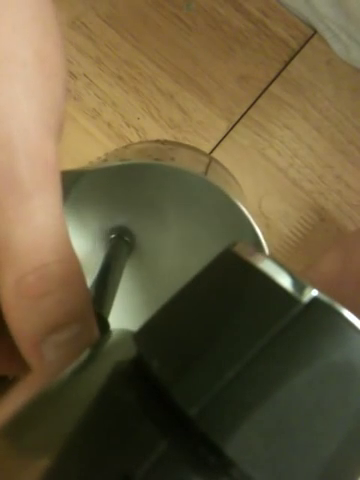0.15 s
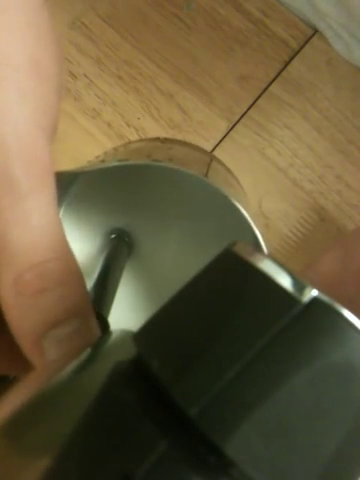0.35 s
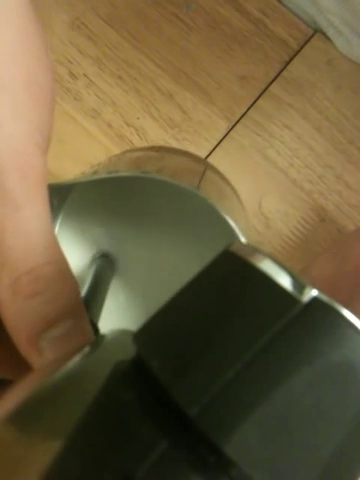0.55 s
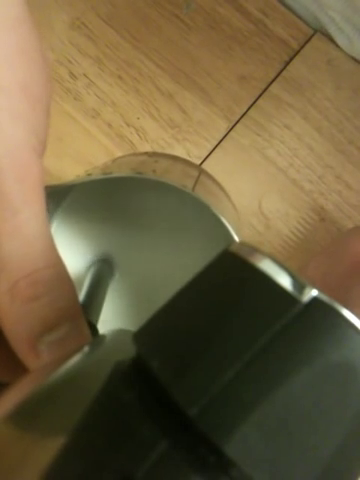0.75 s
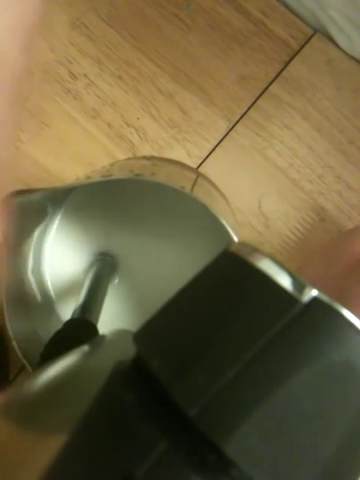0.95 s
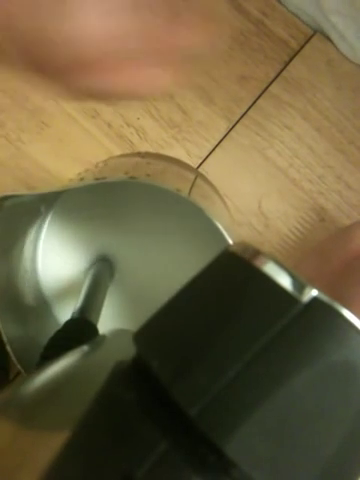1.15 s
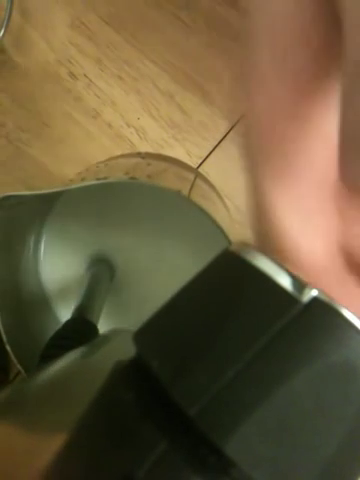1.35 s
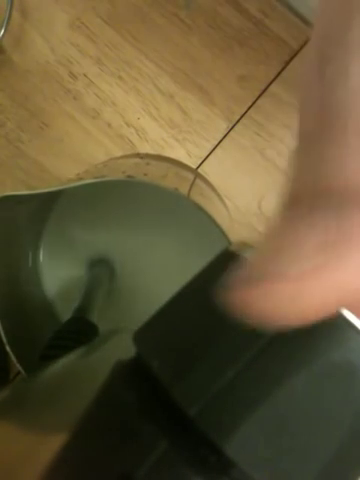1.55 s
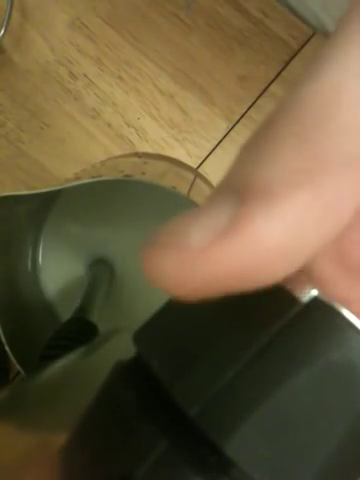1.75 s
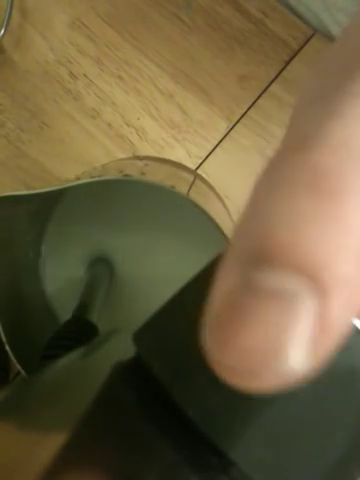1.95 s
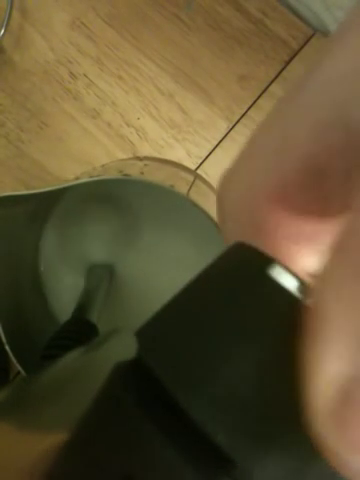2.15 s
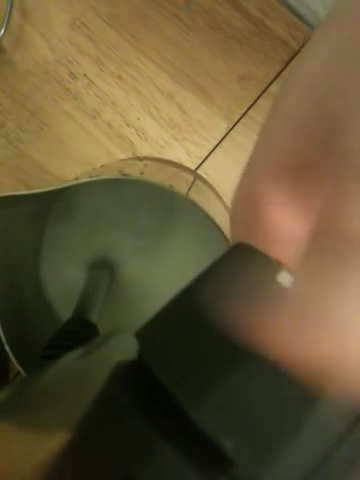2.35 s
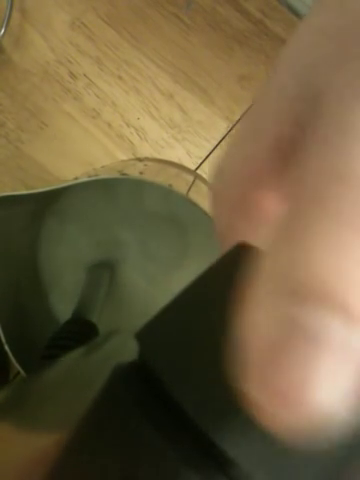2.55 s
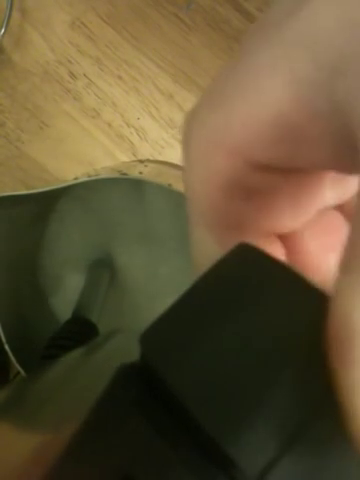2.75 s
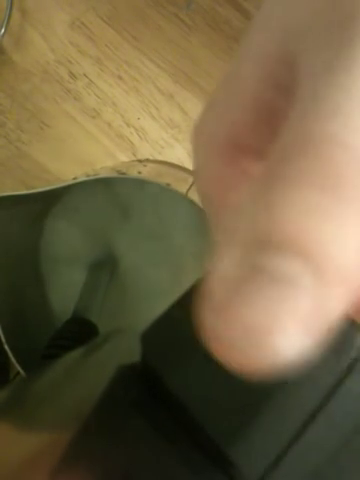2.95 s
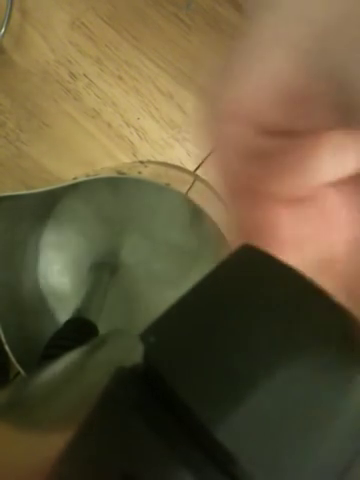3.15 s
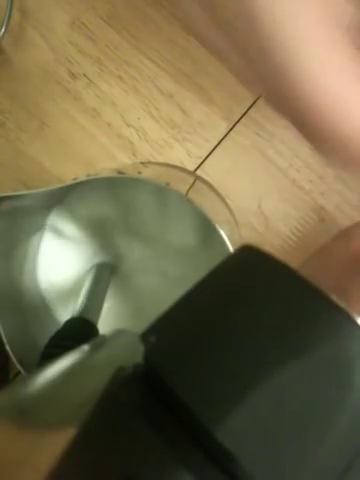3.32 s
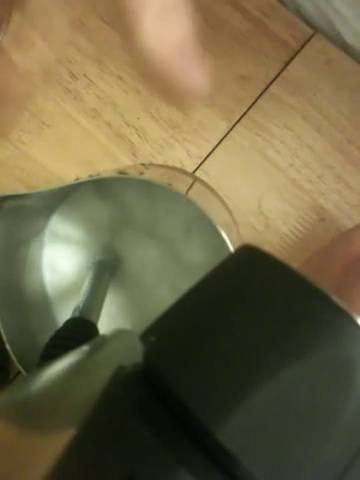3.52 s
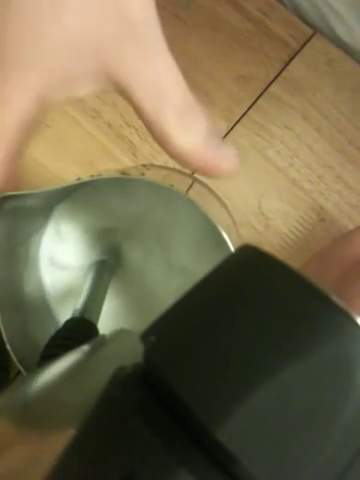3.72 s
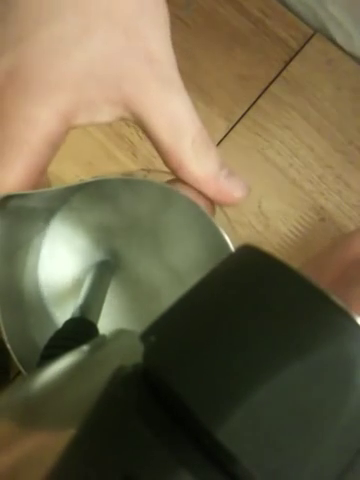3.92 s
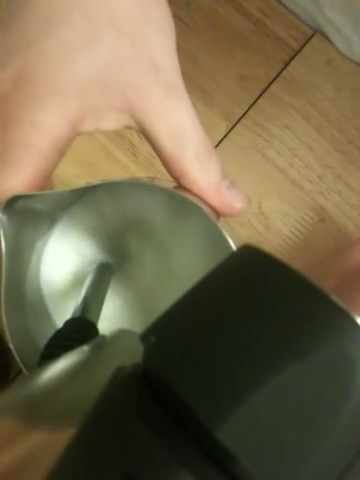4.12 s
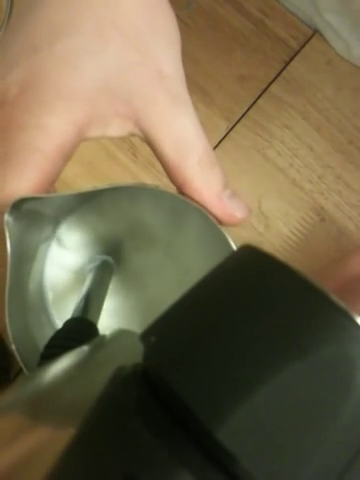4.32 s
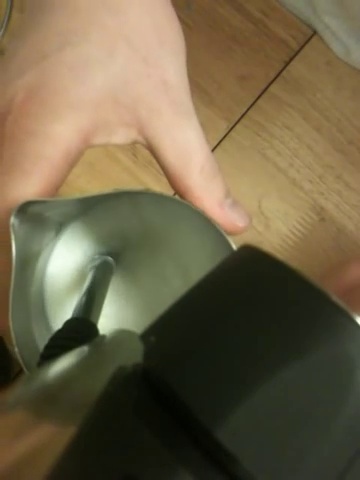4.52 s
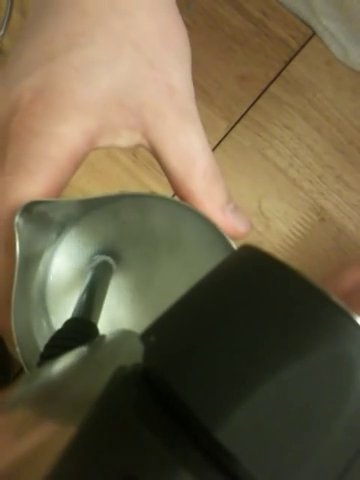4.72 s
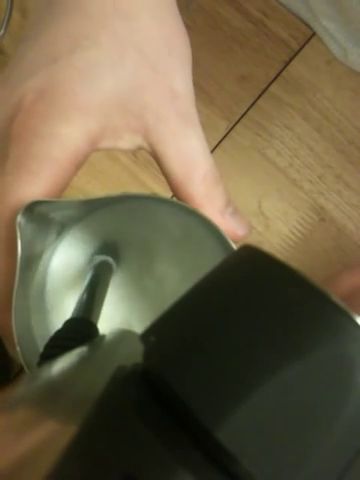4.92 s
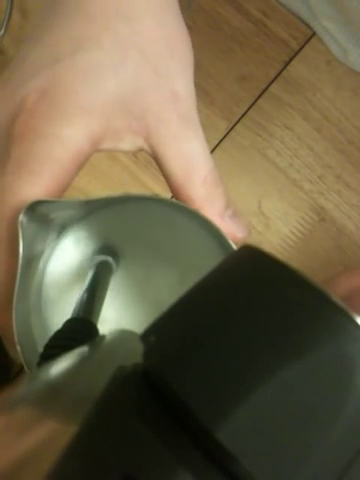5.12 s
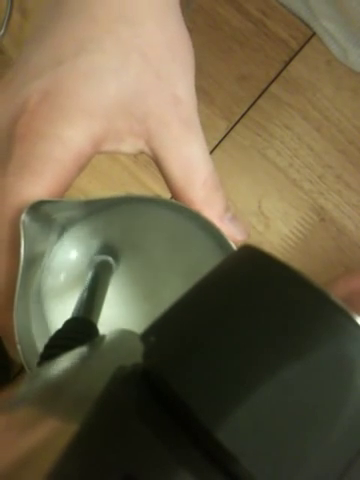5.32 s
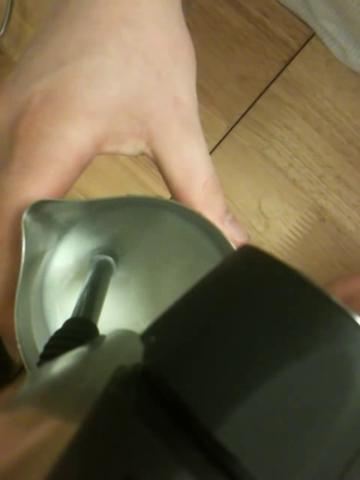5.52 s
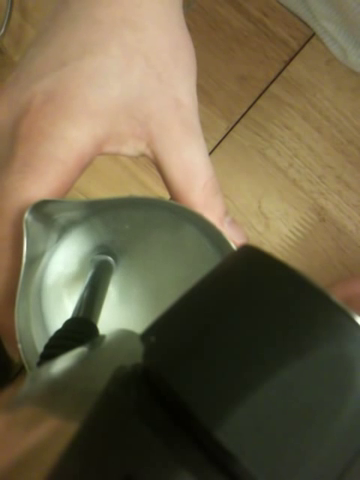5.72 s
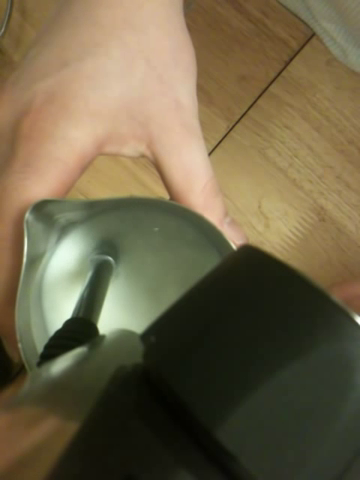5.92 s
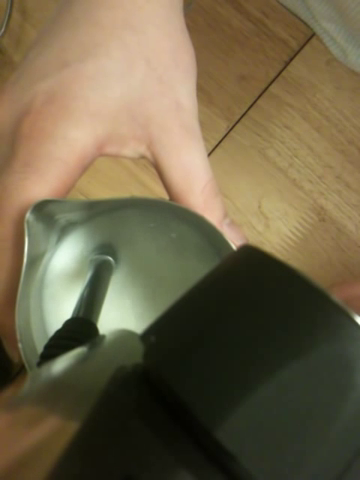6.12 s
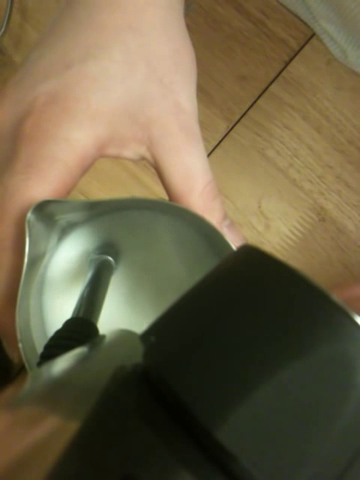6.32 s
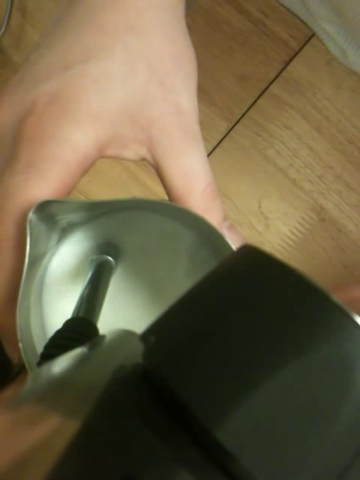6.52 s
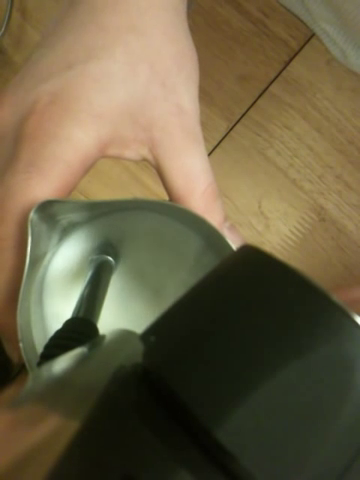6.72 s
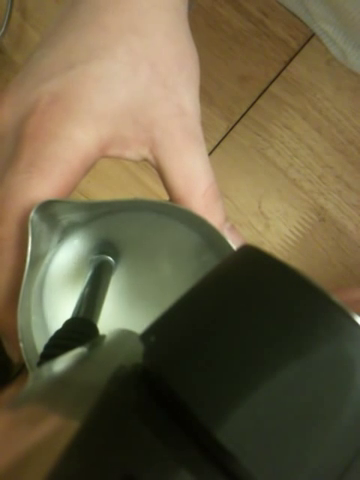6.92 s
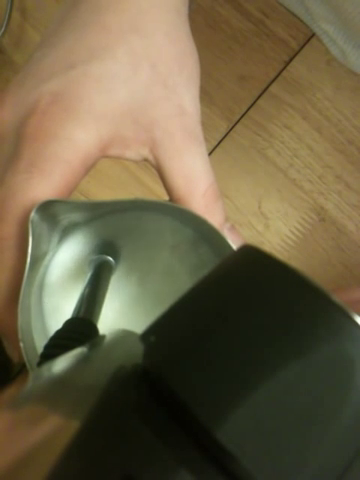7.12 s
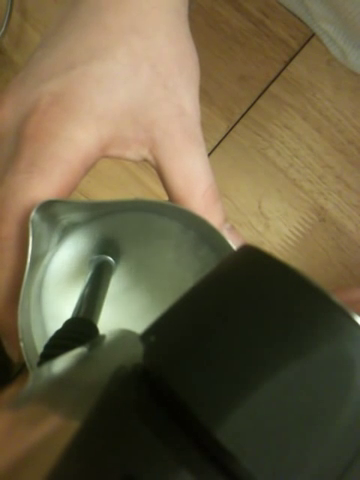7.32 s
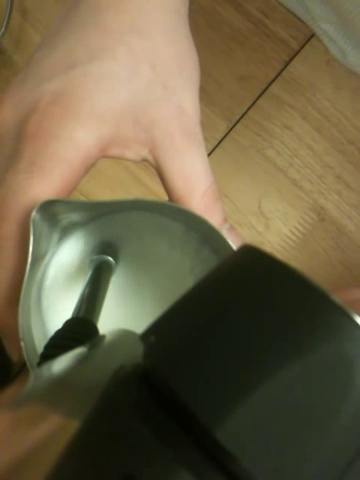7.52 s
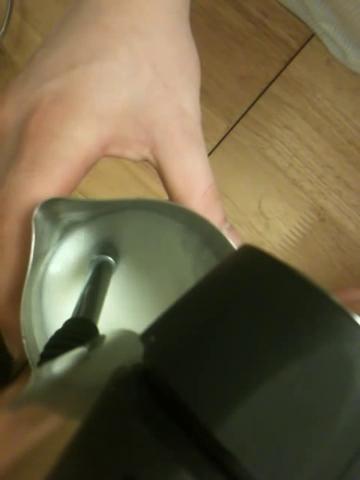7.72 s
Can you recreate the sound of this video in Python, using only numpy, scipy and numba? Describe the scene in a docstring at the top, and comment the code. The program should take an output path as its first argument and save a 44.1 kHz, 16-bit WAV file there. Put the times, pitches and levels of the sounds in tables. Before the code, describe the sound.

A close microphone in a small kitchen with a short, dense echo picks up a low, steady room hum. Soft, dull knocks on a steel pitcher and machine come at about 0.04, 0.17, 0.5, 0.94, 1.2 and 1.9 seconds, with a very faint rim scrape around 1 to 1.5. At 2.1 a wand spits and air gurgles in low bubbles as the valve hisses. At 2.26 a sudden loud shriek, by far the loudest moment, jumps upward in pitch and breaks into rough squeals until about 2.8. Frothing then continues quieter to the end near 7.8: a sputtering, whistling hiss around a medium-high pitch, surging several times a second, with pops, chirps and a brief dip near 4.3. Short crackling spurts grow frequent after 5, pitch creeps upward, a thinner higher whistle appears after 6.4, and milk rolls softly underneath.

```python
"""A steam wand froths milk in a steel pitcher, close by in a small kitchen. Bubbles of steam collapse in the milk:
first they screech, then they settle into a whistling hiss that comes in surges. Before that, hands bump the
pitcher and machine softly, the valve opens and air gurgles out of the wand. The milk churns underneath.
Random clicks through moving resonances make the bubbles and the spray; gliding sine tones make the single notes."""
import sys
import numpy as np
from scipy import signal
from scipy.fft import rfft, irfft, next_fast_len
from scipy.io import wavfile
from scipy.ndimage import uniform_filter1d
from numba import njit

SR = 44100
rng = np.random.default_rng(int(sys.argv[2]) if len(sys.argv) > 2 else 0)


def wav_record(signal):
    """Record a signal, one row per channel, as 16-bit PCM in the file named by sys.argv[1]."""
    frames = np.transpose(np.atleast_2d(signal))
    bounded = np.clip(frames, -1, 1)
    # unit amplitude maps onto the largest positive 16-bit level
    quanta = np.round(bounded * 32767).astype(np.int16)
    wavfile.write(sys.argv[1], SR, quanta)


N = 342216
T = np.arange(N) / SR

# main pitch of the collapsing bubbles, climbing overall as the milk warms: (time [s], pitch [Hz])
RING_PITCH = [(2.55, 2370), (2.98, 2237), (3.2, 2438), (3.75, 2343), (4.65, 2602), (4.87, 2402),
              (5.05, 2540), (5.9, 2690), (6.3, 2593), (6.85, 2723), (7.5, 2710), (7.76, 2540)]
# tone colour of crackling steam: (frequency [Hz], relative level [dB])
CRACKLE_COLOUR = [(100, -42), (600, -12), (2100, -11), (2650, 9.5), (3250, 3.5), (3600, 1.5), (4200, 7.5),
                  (5300, 8), (7000, -4), (10000, -4.5), (13000, -28), (17000, -21)]


def undb(db):
    """Turn decibels into a gain."""
    return 10 ** (np.asarray(db) / 20)


def unit(x):
    """Scale a sound to an average strength (rms) of 1."""
    return x / np.sqrt(np.mean(x ** 2))


def curve(rows, order=1):
    """One column of a table, joined by straight lines in time."""
    rows = np.array(rows, float)
    return np.interp(T, rows[:, 0], rows[:, order])


def gain(rows, order=1):
    """A dB column as a gain: silent before its first row, dying away after its last."""
    after = np.maximum(T - rows[-1][0], 0)
    return undb(curve(rows, order)) * (T >= rows[0][0]) * np.exp(-after / 0.012)


def ramp(start_s, rise_s):
    """Rise from 0 to 1 in a straight line and stay there."""
    return np.clip((T - start_s) / rise_s, 0, 1)


def swell(start_s, length_s, rise_s, fall_s):
    """Rise, hold until the length is over, then die away."""
    release = np.exp(-np.maximum(T - start_s - length_s, 0) / fall_s)
    return ramp(start_s, rise_s) * release


def walk(rate):
    """Smooth random motion with a spread of 1; a higher rate [steps per s] moves faster."""
    size = max(int(SR / rate), 2)
    steps = np.repeat(rng.standard_normal(N // size + 1), size)[:N]
    return unit(uniform_filter1d(steps, size))


def colour(x, points):
    """Shape a sound by a table of (frequency [Hz], relative level [dB]); rms 1."""
    hz, db = np.transpose(points)
    size = next_fast_len(N)
    bins = np.maximum(np.arange(size // 2 + 1) * SR / size, 1)
    shape = undb(np.interp(np.log(bins), np.log(hz), db))
    return unit(irfft(rfft(x, size) * shape, size)[:N])


@njit
def bandpass(x, hz, width):
    """Keep the band around a moving centre, with a state-variable filter."""
    y, band, low = np.empty(len(x)), 0., 0.
    for i in range(len(x)):
        g, k = np.tan(np.pi * hz[i] / SR), width / hz[i]
        v = (band + g * (x[i] - low)) / (1 + g * (g + k))
        band, low, y[i] = 2 * v - band, low + 2 * g * v, k * v
    return y


def resonance(x, hz, width_hz):
    """A resonance with steep sides: the same band-pass twice."""
    hz = hz + np.zeros(N)
    once = bandpass(x, hz, float(width_hz))
    return bandpass(once, hz, float(width_hz))


def collapses(rate, spread_db):
    """Random clicks of imploding bubbles (rate per s); a wider spread makes a few much larger than the rest."""
    sizes = undb(spread_db * np.minimum(rng.exponential(size=N), 4))
    return unit((rng.random(N) < rate / SR) * sizes * rng.choice([-1, 1], N))


def body(modes, rate, spread_db):
    """Resonances (frequency [Hz], width [Hz], level [dB]), each rung by its own dense clicks; rms 1."""
    return unit(sum(undb(db) * resonance(collapses(rate, spread_db), hz, width) for hz, width, db in modes))


def swarm(clicks, hz, width_hz, whistle_db, waver, wander, patchy_db):
    """Bubbles of like size ring round one pitch; on and off, some lock together into a wandering whistle."""
    pitch = hz * (1 + wander * walk(rate=22) + waver * walk(rate=360))
    crowd = np.sqrt(uniform_filter1d(clicks ** 2, size=180) + 1e-9)  # how strong the clicks are just now
    drive = crowd * undb(patchy_db * np.tanh(walk(rate=25)))
    whistle = drive * np.sin(2 * np.pi * np.cumsum(pitch) / SR)
    return unit(unit(resonance(clicks, hz, width_hz)) + undb(whistle_db) * unit(whistle))


def bubbles(rows, rise_s, rough):
    """Each bubble rings unevenly at a gliding pitch and dies away."""
    out, wobble = np.zeros(N), walk(rate=490)
    for start, db, hz, t60, bend in rows:
        i = int(start * SR)
        t = T[:min(int(t60 * SR), N - i)]
        pitch = hz * bend ** np.minimum(t / .01, 1.5)  # the glide stops after 15 ms
        ring = np.sin(2 * np.pi * np.cumsum(pitch) / SR + rough * wobble[i:i + len(t)])
        envelope = (1 - np.exp(-t / rise_s)) * np.exp(-np.log(1000) * t / t60)
        out[i:i + len(t)] += undb(db) * envelope * ring
    return out


def blast(level_db, sag_db_per_s):
    """Gain of one part of the first blast of steam: it arrives, sags steadily and breaks off."""
    start_s = 2.257
    sag_db = sag_db_per_s * np.maximum(T - start_s, 0)
    return swell(start_s, length_s=0.52, rise_s=0.024, fall_s=0.023) * undb(level_db - sag_db)


def squeals():
    """Gain of the short squeals into which the screech breaks up."""
    # (time [s], length [s], level [dB])
    squeal_rows = [(2.359, 0.044, -29), (2.416, .008, -26), (2.441, 0.0086, -27), (2.456, .012, -27),
                   (2.495, 0.037, -27), (2.584, 0.036, -30), (2.648, 0.069, -30), (2.767, 0.016, -25.5)]
    return sum(undb(db) * swell(start, length, rise_s=0.0072, fall_s=0.0077) for start, length, db in squeal_rows)


def screech():
    """The steam pocket at the nozzle swells and collapses almost regularly, cracking hardest once a cycle."""
    # how often the pocket pulsates: (time [s], pitch [Hz])
    pulse_pitch = [(2.26, 1293), (2.328, 1315), (2.358, 1628), (2.39, 1785), (2.44, 1902), (2.53, 1944),
                   (2.6, 1956), (2.71, 1966), (2.85, 1918)]
    # unsteadiness and brightness: (time [s], pitch scatter [share], overtone level [dB])
    roughness = [(2.26, 0.034, -29), (2.33, 0.051, -24), (2.38, 0.052, -9.5), (2.47, 0.048, -2.5),
                 (2.6, 0.042, 0), (2.8, .041, 1)]
    # (multiple of the pitch, level [dB])
    overtone_rows = [(2, -5), (3, -14), (4, -14.5), (5, -16.5), (6, -22), (7, -28), (8, -26)]

    pitch = curve(pulse_pitch)
    phase = 2 * np.pi * np.cumsum(pitch * (1 + curve(roughness) * walk(rate=520))) / SR
    throb = unit(undb(4.3 * np.tanh(walk(rate=230))))
    tone = unit(resonance(np.cos(phase) * throb, pitch, width_hz=4200))
    harmonics = sum(undb(db) * np.cos(k * phase) for k, (_, db) in enumerate(overtone_rows, 2))
    overtones = np.sqrt(2) * throb * harmonics
    voice = tone + undb(curve(roughness, order=2)) * overtones

    cycle = 1 + np.cos(phase)
    cracks = colour(collapses(rate=12000, spread_db=1.0) * cycle, CRACKLE_COLOUR)
    spray = unit(resonance(collapses(rate=14000, spread_db=2.0) * cycle, hz=12600, width_hz=35000))

    # one loud shriek, then short squeals; both bring extra cracking, and the squeals bring spray
    shriek = undb(-13) * swell(2.26, length_s=0.073, rise_s=0.032, fall_s=0.028)
    voicing = shriek + squeals() + blast(level_db=-28.5, sag_db_per_s=14)
    cracking = blast(level_db=-26.5, sag_db_per_s=38) + undb(-21.5) * shriek + undb(-33) * squeals()
    # fine spray sizzles once the wand has cleared
    first_spray = undb(-37.5) * swell(2.27, length_s=0.25, rise_s=.13, fall_s=.04)
    spraying = first_spray + undb(-23) * squeals()
    return voice * voicing + (cracks * cracking + spray * spraying) * np.sqrt(throb)


def frothing(level_db, db_per_s, extra_db=0):
    """Gain of one part of the frothing: it fades in, any extra level settles, and it drifts as the foam grows."""
    start_s, rise_s, settle_s = 2.44, 0.11, 0.47
    age = np.maximum(T - start_s, 0)
    return ramp(start_s, rise_s) * undb(level_db + db_per_s * age + extra_db * np.exp(-age / settle_s))


def surges():
    """Lift in dB that surges of steam give to the ring and the whistle; the strongest surge wins."""
    # (time [s], length [s], lift of the ring [dB], lift of the whistle [dB]); a lift below 0 counts as none
    surge_rows = [(2.55, 0.042, 5, 16), (2.831, 0.19, 3, 18.5), (3.072, 0.02, 7, 0), (3.173, 0.029, 6, -2),
                  (3.277, 0.19, 4.5, 11), (3.476, 0.039, 2, 18), (3.604, 0.085, 5.5, 16.5),
                  (3.78, 0.078, 4, 14), (3.912, 0.035, 5, 4), (4.04, 0.067, 5.5, 16.5), (4.176, 0.06, 6, 5),
                  (4.447, 0.028, 10.5, 8), (4.643, 0.1, 4, -5), (4.853, 0.087, 4, 8.5),
                  (5.042, 0.03, 2.5, -2), (5.106, .06, 6, 17), (5.224, 0.2, 3, 17), (5.502, 0.067, 4.5, 15),
                  (5.624, 0.095, 5, 15.5), (5.756, 0.15, 4.5, 15.5), (6.02, 0.059, 1, 6),
                  (6.15, 0.058, 6.5, 14), (6.248, 0.024, 3.5, 10), (6.452, 0.082, 5.5, 9),
                  (6.598, 0.052, -2.5, 6), (6.802, 0.06, 5, 8), (6.986, 0.053, 6.5, 12),
                  (7.122, 0.04, 5, 8), (7.297, 0.056, 3, 4), (7.416, 0.08, 4.5, -3), (7.681, 0.051, -4, 8)]
    ring, whistle = np.zeros(N), np.zeros(N)
    for start, length, ring_db, whistle_db in surge_rows:
        shape = swell(start, length, rise_s=0.0056, fall_s=0.019)
        ring = np.maximum(ring, ring_db * shape)
        whistle = np.maximum(whistle, whistle_db * shape)
    return ring, whistle


def lulls():
    """Gain of the whole flow, which dips when it chokes briefly."""
    # (time [s], length [s], drop [dB])
    lull_rows = [(3.11, 0.045, 1.5), (3.532, 0.039, 1.5), (4.275, 0.07, 5.5), (4.57, 0.033, 2),
                 (4.76, .05, 1), (7.551, 0.046, 3.5)]
    return undb(-sum(db * swell(start, length, rise_s=0.0056, fall_s=0.019) for start, length, db in lull_rows))


def froth(lift_db, whistle_lift_db):
    """Swarms of bubbles implode in sputters; they ring, whistle and sound the pitcher's air."""
    # higher whistle of the smaller bubbles, which jumps up late: (time [s], pitch [Hz])
    whistle_pitch = [(2.26, 3100), (2.9, 3323), (3.68, 3124), (3.84, 3504), (4.55, 3130), (5.15, 3526),
                     (5.4, 3280), (5.58, 3032), (5.68, 3417), (6.43, 3380), (6.48, 3954), (7.76, 4020)]
    # lower resonance, climbing overall as the foam grows: (time [s], pitch [Hz])
    foam_pitch = [(2.4, 1440), (4.44, 1430), (4.62, 1920), (4.8, 1440), (5.5, 1560), (7.76, 1661)]
    # strength of that resonance before the surges lift it: (time [s], level [dB])
    foam_level = [(2.8, -81), (4.0, -70), (4.8, -58), (5.05, -52), (5.8, -54), (6.5, -52), (7.35, -56),
                  (7.76, -68)]
    # air resonances of the pitcher: (frequency [Hz], relative level [dB])
    pitcher_air = [(200, -40), (540, -26.5), (700, -12), (790, 3.5), (890, 5.5), (975, 5.5), (1060, -16),
                   (1140, -15), (1300, 0), (1560, -9), (1950, -18), (2600, -16), (8000, -32)]
    # the wand gulps air: (time [s], length [s], boom of the pitcher [dB], foam resonance [dB])
    gulp_rows = [(2.342, 0.034, -37, -23.5), (2.458, 0.022, -33.5, -27.5), (2.672, 0.031, -44, -32.5),
                 (4.244, 0.03, -46, -37.5), (4.468, 0.086, -49, -47.5)]

    sputter = unit(undb(1.75 * walk(rate=90)))
    ring = swarm(collapses(rate=1500, spread_db=1.0) * sputter, curve(RING_PITCH), width_hz=700,
                 whistle_db=-3, waver=0.01615, wander=.045, patchy_db=2)
    cavity_hz = 2440 * (1 + .03 * walk(rate=11))
    cavity = unit(resonance(ring, cavity_hz, width_hz=210))
    ring = unit(ring + undb(-10) * cavity)
    whistle = swarm(collapses(rate=1000, spread_db=0.5) * sputter, curve(whistle_pitch), width_hz=1360,
                    whistle_db=-3, waver=0.0123, wander=.012, patchy_db=4.0)
    foam = unit(resonance(collapses(rate=2900, spread_db=0.5) * sputter, curve(foam_pitch), width_hz=295))
    hollow = colour(collapses(rate=2000, spread_db=1) * sputter, pitcher_air)
    gulps = sum((undb(boom_db) * hollow + undb(foam_db) * foam) * swell(start, length, rise_s=0.012, fall_s=0.036)
                for start, length, boom_db, foam_db in gulp_rows)

    # the ring starts harder and settles; foam and hollow follow only a share of its lift
    ringing = frothing(-42 + lift_db, db_per_s=-0.11, extra_db=10)
    whistling = frothing(-57.5 + whistle_lift_db, db_per_s=0.16) + blast(level_db=-38.5, sag_db_per_s=35)
    foaming = gain(foam_level) * undb(0.63 * lift_db)
    booming = blast(level_db=-26.5, sag_db_per_s=45) + undb(-17.5) * squeals()
    hollowing = frothing(-48.5 + 0.65 * lift_db, db_per_s=-1.56) + booming
    return ring * ringing + whistle * whistling + foam * foaming + hollow * hollowing + gulps


def jet(lift_db):
    """The steam jet hisses and rasps in uneven sputters; its sizzle climbs and its finest fizz flutters on its own."""
    # strength of the jet before the surges lift it: (time [s], level [dB])
    hiss_level = [(2.6, -40), (2.9, -42), (3.2, -45.5), (4.7, -44.5), (4.9, -46.5), (5.7, -45), (6.2, -43),
                  (7.4, -43), (7.76, -42.5)]
    # (frequency [Hz], relative level [dB])
    hiss_colour = [(200, -61), (1100, -13), (1800, -0.5), (3000, 3), (4600, -2.5), (6300, -3.5), (7500, -6),
                   (10000, -7), (12500, -13.5), (14800, -15.5), (16500, -31)]
    # sizzle of the finest bubbles, climbing overall as the milk warms: (time [s], pitch [Hz])
    sizzle_pitch = [(2.9, 5460), (3.45, 5400), (4.4, 6040), (6.0, 6200), (7.76, 6300)]

    hiss = colour(collapses(rate=14000, spread_db=2.0) * undb(1.6 * walk(rate=120)), hiss_colour)
    fizz = signal.sosfilt(signal.butter(1, 8000, "high", fs=SR, output="sos"), hiss)
    sputters = collapses(rate=1400, spread_db=3.0) * undb(9 * np.tanh(walk(rate=14)))
    rasp_hz = 3860 * (1 + 0.24 * np.tanh(walk(rate=9)))
    rasp = unit(resonance(sputters, rasp_hz, width_hz=1800))
    sizzle_hz = curve(sizzle_pitch) * (1 + 0.034 * walk(rate=13))
    sizzle_clicks = collapses(rate=5000, spread_db=0.5) * undb(2.6 * walk(rate=60))
    sizzle = unit(resonance(sizzle_clicks, sizzle_hz, width_hz=1700))
    voices = hiss + 0.18 * walk(rate=12) * fizz + undb(-10.5) * rasp + undb(-8.5) * sizzle
    return voices * gain(hiss_level) * undb(0.065 * lift_db)


def spurts():
    """Steam tears through the surface in short, broad bursts of crackle."""
    # (time [s], length [s], level [dB], centre [Hz])
    spurt_rows = [(3.613, 0.056, -44.5, 3820), (4.388, 0.054, -43, 3160), (4.675, .08, -49, 4200),
                  (5.108, .045, -42.5, 3800), (5.29, .05, -40, 3480), (6.145, 0.094, -43, 3700),
                  (6.475, 0.089, -43, 3700), (6.67, .02, -45, 4600), (6.86, 0.026, -40, 4000),
                  (7.013, 0.054, -44, 3900), (7.12, .045, -40.5, 3530), (7.321, 0.042, -43, 4400),
                  (7.39, 0.075, -41.5, 3370), (7.406, .06, -47, 5900)]
    out = np.zeros(N)
    clicks = unit(collapses(rate=3000, spread_db=1.0) * undb(4 * np.tanh(walk(rate=160))))
    for start, length, db, hz in spurt_rows:
        crackle = unit(resonance(clicks, hz, width_hz=2400))
        out += crackle * undb(db) * swell(start, length, rise_s=0.014, fall_s=0.0084)
    return out


def pops(lift_db, count):
    """Smaller bubbles pop at random round the pitch of the ring, harder in the surges."""
    start_s, strongest_db, range_db, t60_s = 2.8, -26.5, 14, 0.022  # level before the surges lift it
    lowest_ratio, highest_ratio, glide_share = .92, 1.25, 0.055  # pitch against the ring; glide up or down
    when, size, tune, glide = rng.random((count, 4)).T
    at = (np.interp(when, [0, 1], [start_s, T[-1]]) * SR).astype(int)
    db = strongest_db + lift_db[at] - range_db * np.sqrt(size)
    hz = curve(RING_PITCH)[at] * highest_ratio ** (tune ** 2) * lowest_ratio ** (1 - tune ** 2)
    bend = 1 + glide_share * (2 * glide - 1)
    rows = zip(T[at], db, hz, np.full(count, t60_s), bend)
    return bubbles(rows, rise_s=0.00055, rough=0.52)


def bursts():
    """Single large bubbles each ring briefly at a gliding pitch; the first row is the pop of the valve as it
    opens."""
    # (time [s], level before the soft attack [dB], pitch [Hz], time to fade by 60 dB [s], pitch ratio after 10 ms)
    burst_rows = [(2.105, -19.5, 800, 0.033, 1.1), (2.268, -11, 980, 0.051, 1.07),
                  (2.29, -3, 1274, .04, 1.16), (2.325, -1, 1277, .04, 0.92),
                  (2.327, -16.5, 772, 0.066, 0.95), (2.357, -12, 830, 0.058, 1.04),
                  (2.361, -8, 1435, .04, 0.88), (2.387, -10.5, 789, 0.049, 1.04),
                  (2.463, -16, 1470, .035, 1.0), (2.779, -23, 905, 0.044, 1.08),
                  (2.869, -10, 2135, 0.045, 1.14), (2.945, -15, 2070, 0.044, 1.06),
                  (2.983, -12.5, 2165, 0.037, 0.97), (3.021, -14.5, 2147, 0.053, 1.03),
                  (3.282, -14.5, 2340, 0.027, 0.92), (3.668, -17.5, 2460, 0.031, 0.89),
                  (4.1, -10.5, 2454, 0.024, 0.54), (4.108, -14, 2260, 0.023, 1.33),
                  (4.247, -16, 942, 0.045, 0.86), (4.25, -18.5, 1334, 0.038, 0.87),
                  (4.742, -18, 990, 0.04, 0.88), (4.859, -18, 2158, 0.037, 1.08),
                  (5.05, -14, 2680, 0.019, 0.95), (5.25, -14.5, 3400, 0.023, 0.93),
                  (5.348, -15, 2590, 0.026, 0.85), (5.662, -19, 3410, .02, 1.1),
                  (5.678, -17, 3350, .025, 1.1), (5.713, -19, 3456, .025, 1.05),
                  (5.83, -18, 3440, 0.024, .97), (5.846, -16, 3470, 0.025, 0.93),
                  (5.868, -16, 3440, 0.02, 0.87), (6.175, -18, 3400, 0.029, 1.05),
                  (6.26, -19, 2440, .025, 1.1), (6.455, -21, 2440, .025, 0.98),
                  (6.966, -23, 2460, 0.024, 1.0), (6.995, -21, 2740, 0.022, 0.95),
                  (7.127, -22, 2640, .025, 0.95), (7.695, -22.5, 2320, 0.05, 0.98)]
    return bubbles(burst_rows, rise_s=0.0022, rough=0.28)


def chirps(waver, flutter_db):
    """A train of equal bubbles holds one narrow, fluttering note for a moment."""
    # (time [s], length [s], level [dB], first pitch [Hz], last pitch [Hz])
    chirp_rows = [(2.177, 0.061, -33, 356.7, 485), (2.868, 0.075, -31, 2150, 2290),
                  (2.97, 0.065, -35, 2130, 2224), (3.067, 0.039, -36.5, 1646, 1608),
                  (3.087, 0.088, -40, 2400, 2580), (3.352, 0.048, -34, 2383, 2505),
                  (3.469, 0.13, -48, 3220, 3370), (3.646, 0.097, -42, 3116, 3064),
                  (3.73, 0.054, -49, 2130, 1990), (3.799, 0.13, -48, 3540, 3490),
                  (3.92, 0.096, -45, 2376, 2395), (4.457, 0.062, -42, 2510, 2555),
                  (4.505, 0.075, -44, 1596, 2050), (4.636, 0.044, -39, 2440, 2590),
                  (4.866, 0.04, -46, 2226, 2041), (5.37, 0.12, -45, 3390, 3220),
                  (5.446, .12, -48, 3040, 3040), (5.752, 0.12, -38, 3470, 3410),
                  (6.01, 0.044, -42, 2654, 2670), (6.081, .022, -39, 2770, 2810),
                  (6.27, 0.18, -47, 3460, 3370), (6.463, 0.076, -44, 3980, 3880),
                  (6.617, 0.13, -43.5, 4010, 3980), (6.85, .04, -44, 3950, 4000),
                  (6.99, .19, -46.5, 4030, 4040), (7.288, 0.48, -49.5, 4080, 4050)]
    out = np.zeros(N)
    wobble = 1 + waver * walk(rate=400)
    flutter = unit(undb(flutter_db * walk(rate=130)))
    for start, length, db, from_hz, to_hz in chirp_rows:
        pitch = np.interp(T, [start, start + length], [from_hz, to_hz]) * wobble
        note = np.sin(2 * np.pi * np.cumsum(pitch) / SR)
        out += undb(db) * swell(start, length, rise_s=0.01, fall_s=0.012) * note
    return np.sqrt(2) * out * flutter  # a sine of rms 1 has a peak of root 2


def purge():
    """The wand spits once; air gurgles up in big, low bubbles while the opening valve hisses in uneven steps."""
    # air pushed out ahead of the steam: (time [s], bubble pitch [Hz], bubble level [dB], splutter level [dB])
    air_rows = [(2.103, 784, -48, -78), (2.107, 830, -40, -31.5), (2.118, 930, -41, -36.5),
                (2.172, 1000, -40, -43), (2.182, 378, -42, -36.5), (2.2, 406, -40, -37.5),
                (2.24, 460, -42, -37.5), (2.262, 604, -42, -33), (2.29, 800, -59, -51)]
    # steam squeezing through the opening valve: (time [s], level [dB])
    valve_level = [(2.175, -52), (2.205, -49), (2.228, -42.5), (2.245, -48), (2.268, -32), (2.3, -41),
                   (2.36, -24), (2.4, -36)]
    # tone colours of valve and splutter: (frequency [Hz], relative level [dB])
    valve_colour = [(1500, -36), (2550, -7), (2850, -2), (3200, 2.5), (3600, -10), (5500, -12), (7500, -10),
                    (10000, -20.5), (16000, -32)]
    splutter_colour = [(30, -48), (110, -17), (300, -8), (850, -0.5), (1150, -4), (1600, -6), (2200, -19),
                       (3150, -16), (3900, -27), (6000, -31.5), (16000, -39)]

    spit = colour(rng.standard_normal(N), CRACKLE_COLOUR)
    spitting = undb(-51) * swell(2.104, length_s=0.0036, rise_s=0.002, fall_s=.003)
    gurgle = unit(resonance(collapses(rate=830, spread_db=0.0), curve(air_rows), width_hz=125))
    splutter = colour(collapses(rate=1100, spread_db=2.5), splutter_colour)
    valve = colour(collapses(rate=5400, spread_db=2.5), valve_colour)
    air = gurgle * gain(air_rows, order=2) + splutter * gain(air_rows, order=3)
    return spit * spitting + air + valve * gain(valve_level)


def churn():
    """The jet sets the milk rolling steadily; now and then it sloshes more heavily."""
    # resonances of the rolling milk: (frequency [Hz], width [Hz], level [dB])
    milk_modes = [(265, 41.4, 1), (313, 66, -7), (359.2, 26, 5.5), (445.5, 70, -3.5), (604, 110, -6)]
    # heavier sloshes: (time [s], lift [dB])
    slosh_rows = [(3.16, 3), (3.67, 5), (4.531, 7), (5.08, 3), (5.34, 4), (5.7, 6), (6.2, 2.5), (6.45, 4.5),
                  (6.689, 4.5), (7.67, 7)]
    lift_db = sum(db * swell(start, length_s=0.052, rise_s=0.009, fall_s=0.022) for start, db in slosh_rows)
    milk = body(milk_modes, rate=1100, spread_db=1.4)
    return milk * ramp(2.25, rise_s=0.51) * undb(-51 + lift_db)


def knocks():
    """Soft knocks on pitcher and machine crack and ring; the spot hit favours some tones, and steel adds a snap."""
    # (time [s], level [dB], most excited pitch [Hz], fall-off from there [dB per octave], snap level [dB])
    knock_rows = [(0.038, -35, 520, 3.5, -69), (.165, -48, 4550, 9, -65), (.504, -36, 1290, 8.5, -70),
                  (0.938, -37, 1380, 17, -80), (1.199, -40, 470, 1, -56.5), (1.932, -39, 480, 2.5, -85)]
    # what rings: (frequency [Hz], level [dB], time to fade by 60 dB [s])
    ring_modes = [(265, -7, 0.075), (337, -3.5, 0.073), (431, -0.5, 0.065), (480, 0, 0.072),
                  (646, -5, 0.04), (775, -4, 0.035), (965, -6, 0.052), (1270, -7.5, 0.024),
                  (1420, -5, 0.029), (1820, -16, 0.032), (2130, -16, .035), (2900, -19, .02),
                  (3930, -22, 0.027), (4520, -26, .06)]
    # the crack of a knock: (frequency [Hz], relative level [dB])
    contact_colour = [(100, -13), (500, 5), (1600, -2), (2800, -21), (4200, -34), (5500, -32), (12000, -38)]

    out, t = np.zeros(N), T[:SR // 2]
    hz, db, t60 = np.transpose(ring_modes)[:, :, None]
    crack = colour(rng.standard_normal(N), contact_colour)[:len(t)] * np.exp(-t / 0.0099)
    snap = unit(resonance(rng.standard_normal(N), hz=3500, width_hz=1900))[:len(t)] * np.exp(-t / 0.007)
    for start, level_db, centre, fall_db, snap_db in knock_rows:
        # the grip of the hand shifts the pitches from knock to knock
        tuned = hz * (1 + 0.028 * rng.uniform(-1.16, 1, hz.shape))
        envelope = np.exp(-np.log(1000) * t / t60) * (1 - np.exp(-t / 0.0011))
        rings = np.sin(2 * np.pi * tuned * t) * envelope
        octaves_away = np.abs(np.log2(hz / centre))
        sizes = undb(level_db + db - fall_db * octaves_away) * rng.choice([-1, 1], hz.shape)
        cracking = undb(level_db + 0.5 - 3.0 * fall_db)  # a steeper fall-off means a weaker crack
        i = int(start * SR)
        out[i:i + len(t)] += np.sum(sizes * rings, axis=0) + cracking * crack + undb(snap_db) * snap
    return out


def slide():
    """The pitcher's rim slides faintly as the hand lets go: dense clicks ring the steel."""
    # the rim's resonances: (frequency [Hz], width [Hz], level [dB])
    rim_modes = [(1330, 450, 1.5), (3360, 390, -7), (4350, 300, -12)]
    scrape = body(rim_modes, rate=1600, spread_db=1.5)
    return scrape * undb(-68.5) * swell(0.93, length_s=0.5, rise_s=.03, fall_s=.08)


def kitchen(x, t60_s, wet_db):
    """Worktop, machine and walls return a short, dense echo."""
    t = T[:SR // 2]
    tail = rng.standard_normal(len(t)) * np.exp(-np.log(1000) * t / t60_s) * (t > .002)
    echo = signal.fftconvolve(x, tail / np.linalg.norm(tail))[:N]
    return (x + undb(wet_db) * echo) / np.hypot(1, undb(wet_db))


def room_tone():
    """A low, nearly steady background of shaped noise with a faint, high whine."""
    # (frequency [Hz], relative level [dB])
    room_colour = [(15, -73), (25, -53), (118, -13), (156, -3.5), (261, -12.5), (316, -4), (353, -10.5),
                   (517, -14.5), (698, -12), (1080, -20.5), (1270, -18), (1380, -17.5), (2080, -24.5),
                   (8140, -33.5), (17000, -33)]
    whine = unit(resonance(rng.standard_normal(N), hz=15100, width_hz=260))
    hum = colour(rng.standard_normal(N), room_colour)
    return undb(-61 + .5 * walk(rate=5.6)) * hum + undb(-82) * whine


def scene():
    """Steam and handling with the kitchen's echo, over the churning milk and the room tone."""
    lift_db, whistle_lift_db = surges()
    flow = froth(lift_db, whistle_lift_db) + jet(lift_db) + spurts() + pops(lift_db, count=220)
    steam = screech() + flow * lulls() + bursts() + chirps(waver=.012, flutter_db=3.7) + purge()
    handling = knocks() + slide()
    echoing = kitchen(steam, t60_s=0.24, wet_db=-3.5) + kitchen(handling, t60_s=0.23, wet_db=1.0)
    return (echoing + churn() + room_tone())[None]


def record(dry):
    """The microphone loses the deep bass and the very top."""
    thin = signal.sosfilt(signal.butter(2, 70, "high", fs=SR, output="sos"), dry)
    return signal.sosfilt(signal.ellip(10, .2, 70, 17200, fs=SR, output="sos"), thin)


dry = scene()
out = record(dry)
wav_record(out)
```